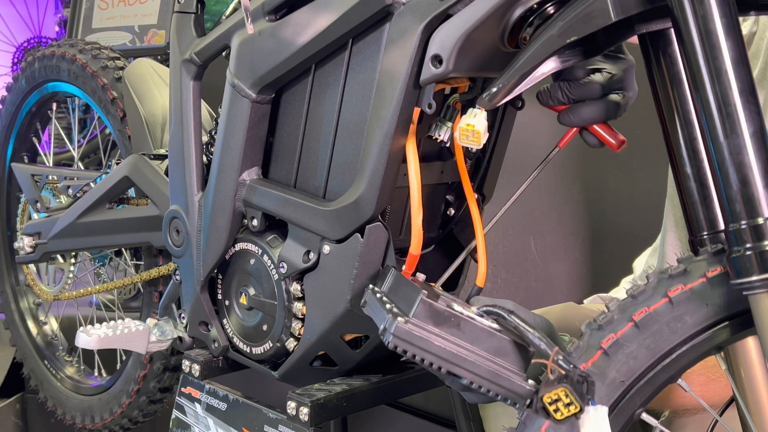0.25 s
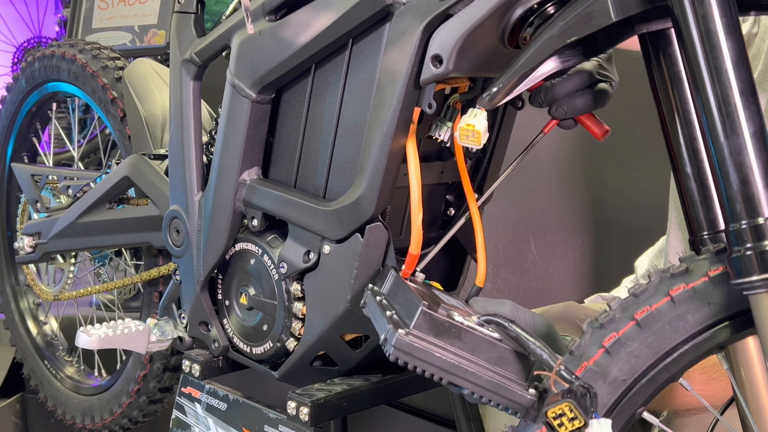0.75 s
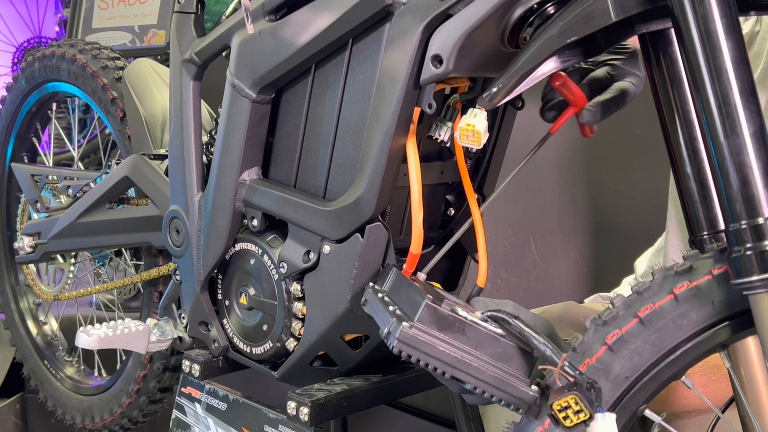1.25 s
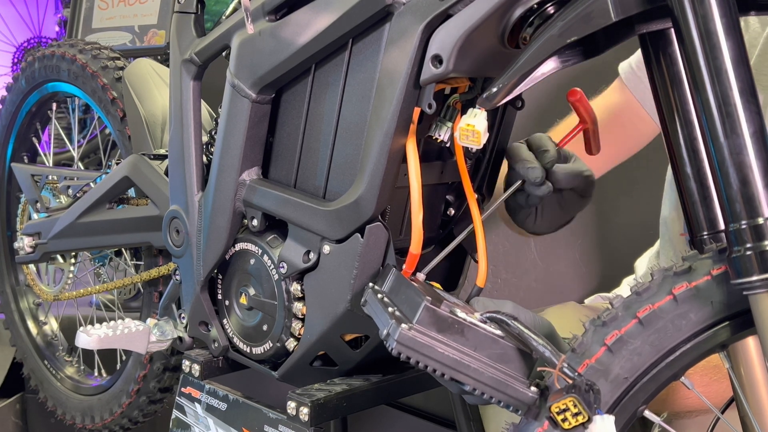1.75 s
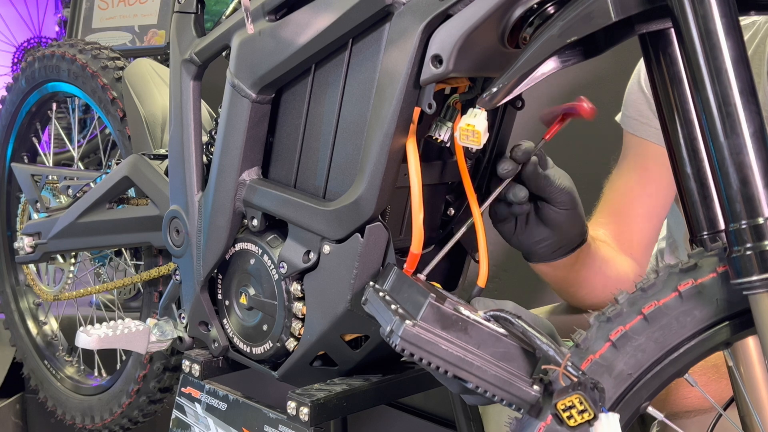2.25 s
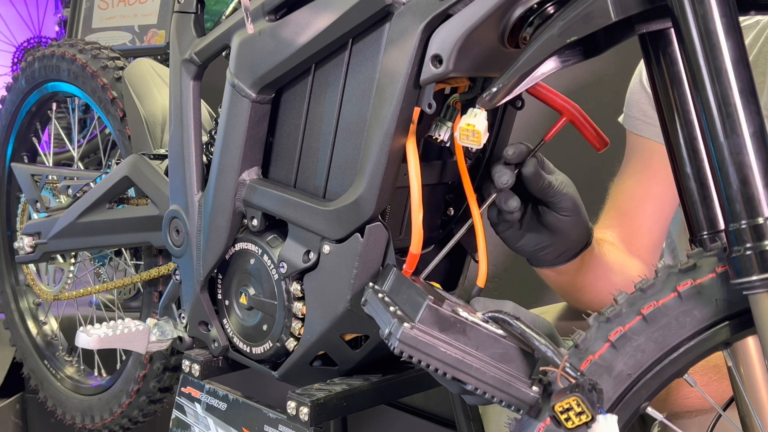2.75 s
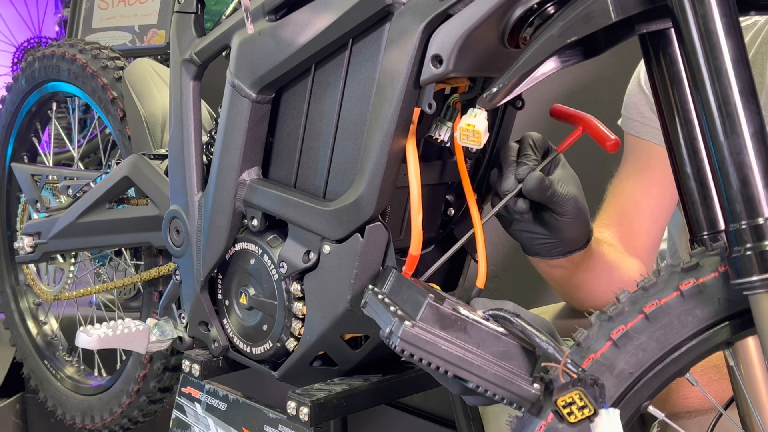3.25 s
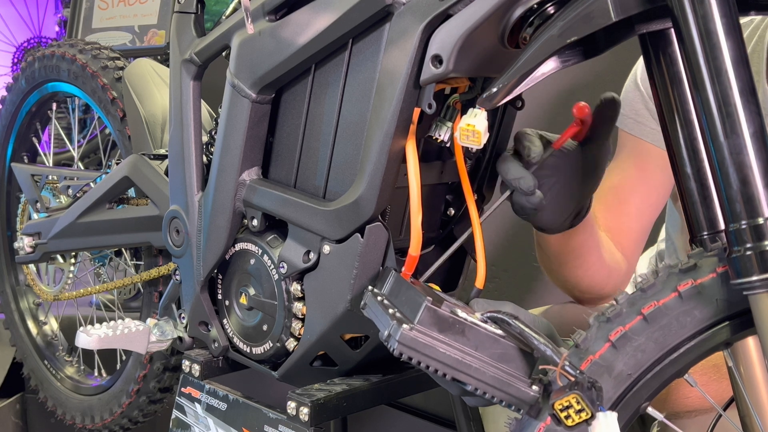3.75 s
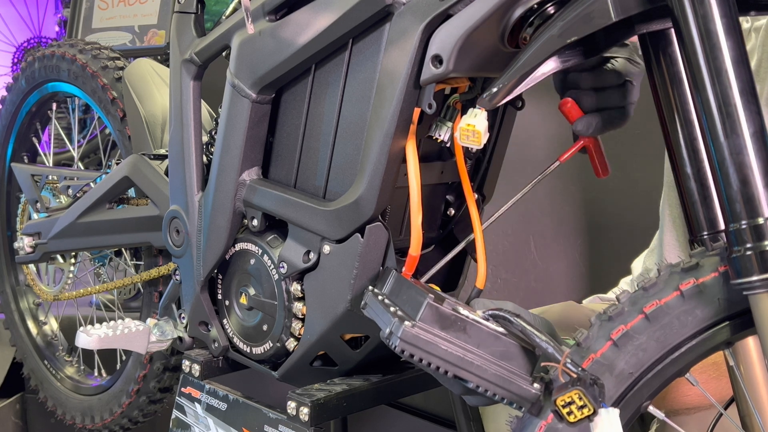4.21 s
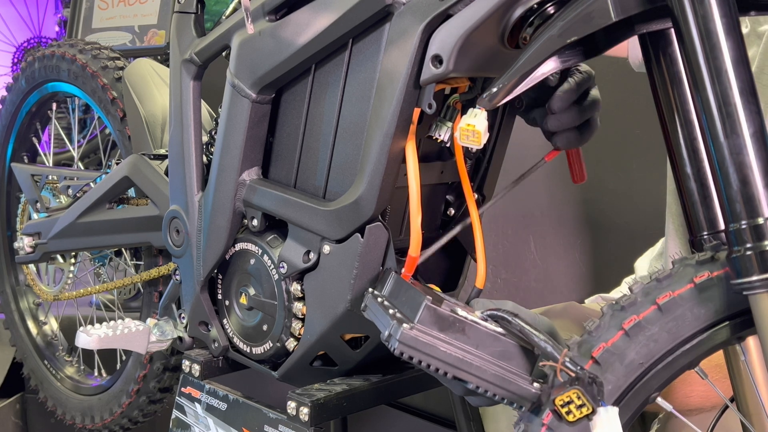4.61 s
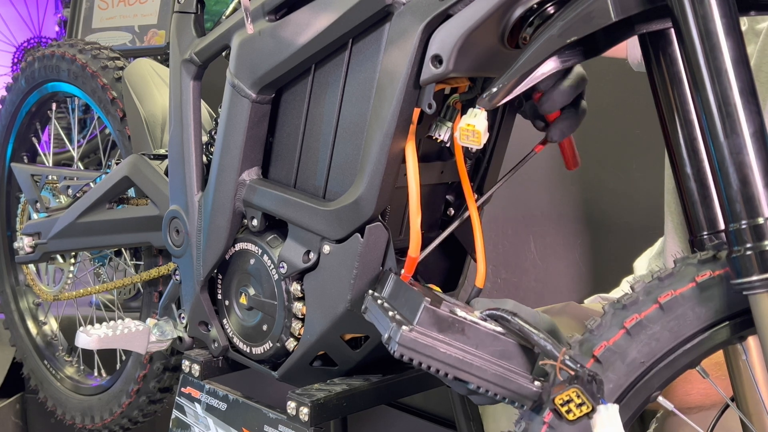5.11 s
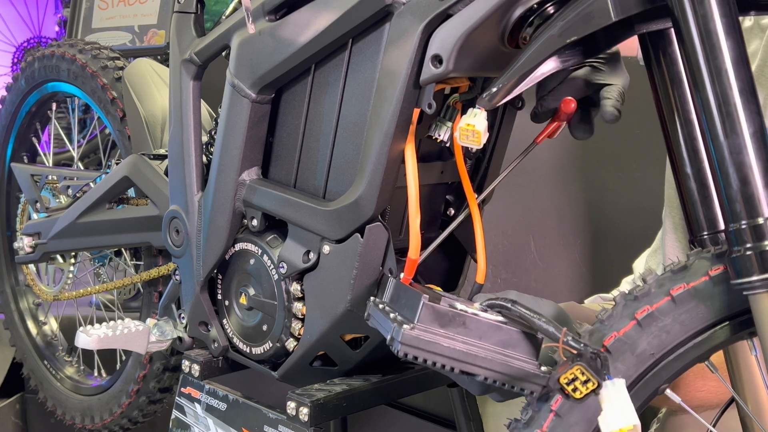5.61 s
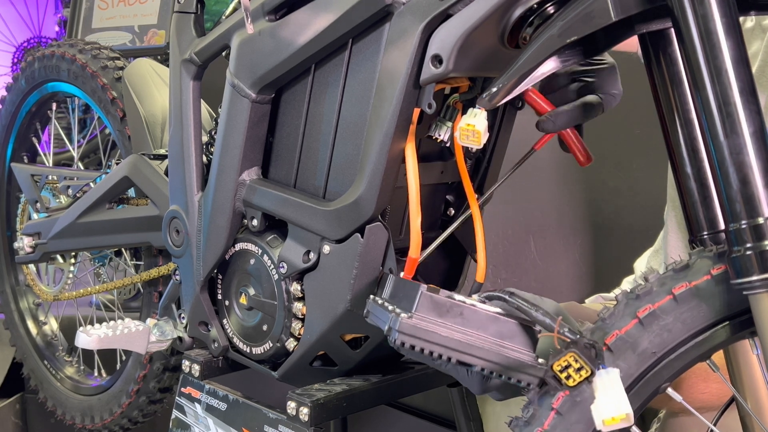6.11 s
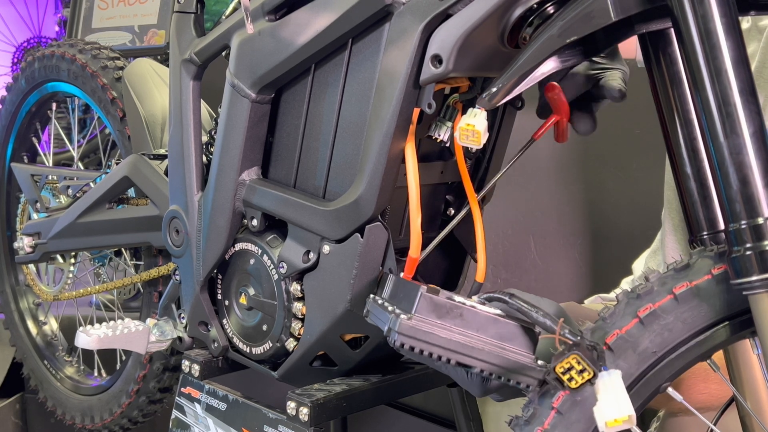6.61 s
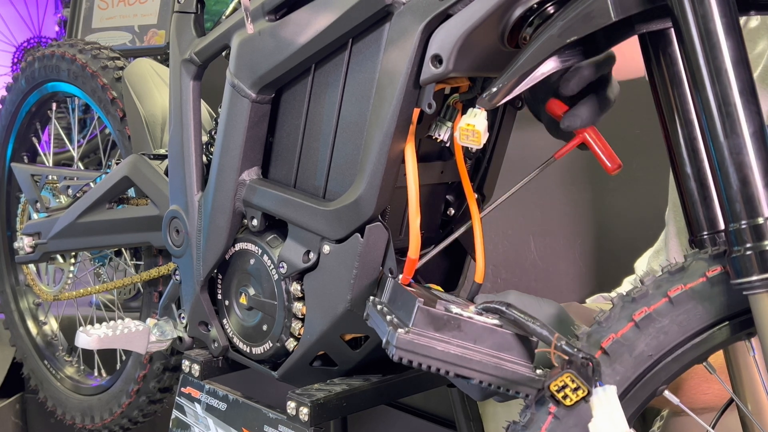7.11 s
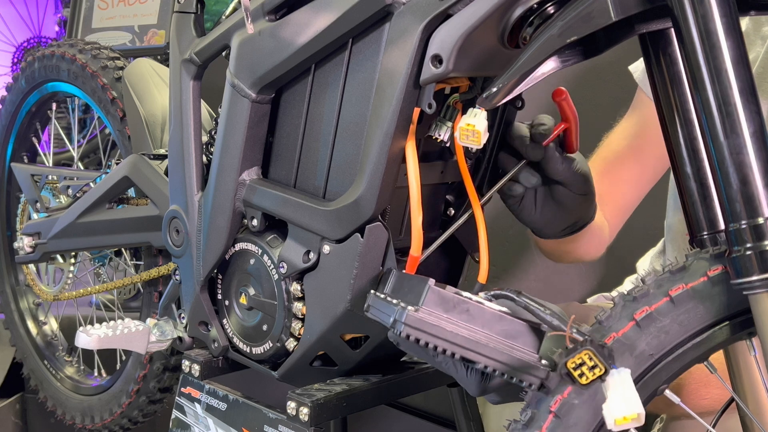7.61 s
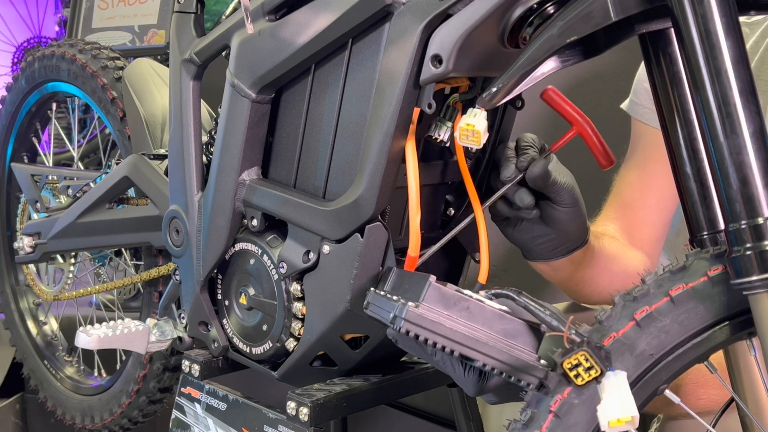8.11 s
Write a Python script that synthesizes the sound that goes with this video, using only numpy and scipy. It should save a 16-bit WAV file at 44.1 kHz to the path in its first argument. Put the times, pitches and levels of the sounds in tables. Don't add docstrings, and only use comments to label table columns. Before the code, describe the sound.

Metal tool on bolts, heard dry and near with the bass cut away: scattered clicks, short shaft scrapes and hollow plastic knocks. An abrupt loud crack comes about a third of the way through, and another, with looser rattling, about three quarters through. Between them are sparse clanks, tiny squeaks and whispering gloves. Faint dull bumps sound across the small, hard workshop, over steady airy fan hiss.

```python
import sys
import numpy as np
from scipy import signal
from scipy.fft import rfft, irfft
from scipy.io import wavfile
from scipy.ndimage import uniform_filter1d

SR = 44100
rng = np.random.default_rng(int(sys.argv[2]) if len(sys.argv) > 2 else 0)


def how_loud(loudness_db):
    steps = np.asarray(loudness_db, float) / 20
    return 10 ** steps


def persist_wave(psi):
    counts = np.round(np.clip(psi, -1, 1) * 32767).astype(np.int16)
    wavfile.write(sys.argv[1], SR, np.atleast_2d(counts).T)


N = 368676
SPAN = 8192
BASS_CUT_HZ, HISS_TOP_HZ = 513, 15950


def bell(hz, centre_hz, width_hz):
    return 1 / np.sqrt(1 + ((hz - centre_hz) / (width_hz / 2)) ** 2)


def shape(x, gain):
    hz = np.arange(len(x) // 2 + 1) * SR / len(x)
    return irfft(rfft(x) * gain(hz), len(x))


def level(x, db):
    return x * how_loud(db) / np.sqrt(np.mean(x ** 2))


def fade(t60):
    return np.exp(-np.log(1000) * np.arange(SPAN) / SR / np.clip(t60, .004, .5))


def swell(length):
    return np.sin(np.pi * np.clip(np.arange(SPAN) / SR / length, 0, 1) ** 0.76)


def ring(hz, db, t60):
    time = np.arange(SPAN) / SR
    return sum(how_loud(d) * fade(s) * np.sin(2 * np.pi * f * time) for f, d, s in zip(hz, db, t60))


def add(out, s, sound, db):
    i = int(s * SR)
    out[i:i + SPAN] += (sound * how_loud(db) / np.abs(sound).max())[:len(out) - i]


# frequency in Hz, density in dB per Hz.
FAN = [(160, -76.5), (280, -55.5), (455, -10), (646, -7), (1390, -6), (3050, -14), (11700, -29),
       (15200, -37)]
# frequency in Hz, width in Hz, level in dB.
FAN_NOTES = [(239, 36, -97.5), (480, 11, -72), (2500, 70, -71.5)]


def fan():
    log_hz, db = np.log(np.array(FAN)[:, 0]), np.array(FAN)[:, 1]
    hiss = shape(rng.standard_normal(N), lambda f: how_loud(np.interp(np.log(f + 1), log_hz, db)) * (f < HISS_TOP_HZ))
    waver = np.repeat(rng.standard_normal(N // 4000 + 1), 4000)[:N]
    waver_db = 0.73 * uniform_filter1d(waver, size=4000)
    notes = np.zeros(N)
    for hz, width_hz, note_db in FAN_NOTES:
        notes += level(shape(rng.standard_normal(N), lambda f: bell(f, hz, width_hz) ** 2), note_db)
    return level(hiss, -57.5) * how_loud(waver_db) + notes


# frequency in Hz, width in Hz, level in dB.
SCRAPE = [(7450, 700, 6), (10200, 1200, 2.5), (12200, 2200, -1.5), (14000, 1900, -23.5)]


def scrape(hz):
    return sum(how_loud(d) * bell(hz, c, w) ** 2 for c, w, d in SCRAPE)


# frequency in Hz, level in dB.
COVER = [(880, 1), (1010, 4), (1157, 6), (1280, -9), (1540, 5), (1900, -9)]
# frequency in Hz, level in dB.
UPPER = [(2420, -2), (2705, -13), (3140, 0.5), (3370, -5.5), (3930, -5), (4530, -12)]
# start in seconds, length in seconds, bright level in dB, middle level in dB, cover level in dB.
SLIDES = [
    (.365, 0.042, -53.5, -56, -58),
    (1.975, 0.07, -51, -59, -59.5),
    (2.33, 0.048, -47.5, -64, -53.5),
    (7.86, 0.089, -66, -59.5, -52.5),
]
# start in seconds, length in seconds, bright level in dB, middle level in dB, cover level in dB.
CHATTERS = [
    (2.376, 0.066, -43.5, -48.5, -49),
    (2.645, 0.081, -44, -43.5, -37),
    (5.06, 0.042, -38.5, -53, -67),
    (8.04, 0.02, -60, -59.5, -39.5),
]


def slides():
    time = np.arange(N) / SR
    grip_db = 1.1 * np.repeat(rng.exponential(size=(3, N // 88 + 1)), 88, axis=1)[:, :N]
    grains = rng.standard_normal((3, N)) * how_loud(grip_db)
    upper = lambda f: sum(how_loud(d) * bell(f, c, 110) ** 2 for c, d in UPPER)
    bright = shape(grains[0], scrape)
    middle = shape(grains[1], lambda f: upper(f) + 0.51 * bell(f, 5000, 4800) ** 2)
    cover = shape(grains[2], lambda f: sum(how_loud(d) * bell(f, c, 109) ** 2 for c, d in COVER))
    gains = np.zeros((3, N))
    for table, (rise_db, peak, sag, fall_db) in ((SLIDES, (14, 0.36, 0.75, 20)), (CHATTERS, (.1, 0.12, 0.39, 35))):
        for s, length, *layer_db in table:
            effort_db = np.interp((time - s) / length, [0, peak, sag, 1], [-rise_db, 0, -5.5, -fall_db], -99, -99)
            gains = gains + how_loud(np.add.outer(layer_db, effort_db))
    gains = uniform_filter1d(gains, size=200, axis=1)
    return sum(gain * level(layer, 0) for gain, layer in zip(gains, (bright, middle, cover)))


# start in seconds, peak level in dB, top share in dB, cover share in dB.
TICKS = [(.3905, -46, 12, -14), (.4475, -55, -20, -3), (.7284, -37, 16, -5), (.7753, -42.5, 13, -30),
         (.9452, -45, 30, -28), (1.0851, -30, 5, -28), (1.2424, -41.5, -2, -24), (1.318, -46, -13, -2),
         (1.979, -46, 5, -20), (2.0187, -39, -18, -19), (2.371, -33, 14, -30), (3.3711, -42, 8, -2),
         (4.796, -36, 12.5, -11), (4.832, -45.5, 17, -2), (4.8705, -60, 26, -11), (5.0534, -47.5, 20, -13),
         (5.0679, -30.5, 5.5, -30), (5.0807, -30.5, -2, -27), (5.6503, -35, 0, -3), (5.6575, -36, -4, 1),
         (6.2745, -49, -3, -14), (6.6435, -51, 13, 0), (7.4105, -35, 5.5, -23), (7.8895, -59, 20, -5),
         (8.0215, -41, 19, -12)]
# start in seconds, peak level in dB, top share in dB, cover share in dB.
TOCKS = [(.376, -55, 20, 2), (2.0996, -33.5, 3, -35), (2.4863, -40, 8, -15), (2.4977, -34, -13, -6),
         (3.1087, -50.5, -9, -2), (3.256, -49.5, 4.5, -16), (5.1996, -43, 3, -9), (6.0145, -50, -1, 8.5),
         (6.179, -18.5, -14.5, 2), (7.1675, -41, -12, -8), (7.9374, -60.5, 16, -2), (8.1498, -45, 7, -9)]
# start in seconds, peak level in dB, top share in dB, cover share in dB.
SNAP = [
    (2.6338, -9.5, -2, -7.5),
]
# start in
# seconds, peak level in dB.
PLAY = [(1.3924, -55), (1.673, -57), (3.2321, -57), (3.7896, -57), (3.876, -51.5), (4.6344, -54.5),
        (5.384, -61), (5.5845, -55), (5.96, -56), (5.988, -65), (6.1764, -33), (6.338, -54), (6.429, -65),
        (6.594, -53), (6.6672, -51), (6.6824, -60), (6.931, -52), (7.033, -51), (7.097, -48), (7.212, -52),
        (8.236, -60)]


def tick_rows():
    kinds = ((TICKS, 7660, 0.015), (TOCKS, 5670, 0.026), (SNAP, 7350, 0.0076))
    rows = [(s, db, 6400, 0.012, -1, -1) for s, db in PLAY]
    for table, hz, t60 in kinds:
        rows += [(s, db, hz, t60, top_db, cover_db) for s, db, top_db, cover_db in table]
    return sorted(rows)


# start in seconds, peak level in dB.
RINGS = [
    (0.3966, -40),
    (2.3854, -52),
    (4.795, -27),
    (4.8302, -33),
    (4.87, -38.5),
]
# frequency in Hz, level in dB, t60 in seconds.
ROD = [(4743, -20, .09), (7714, -8, .075), (11390, 0, .075), (12300, -8, .02), (14420, -14, .03)]


def ticks():
    out = np.zeros(N)
    lead = 256
    for s, db, hz, t60, top_db, cover_db in tick_rows():
        chance, patches = rng.standard_normal(6), rng.standard_normal(40)
        rattle = how_loud(-34) * fade(0.08) ** (np.arange(SPAN) / 900)
        burst = np.roll(rng.standard_normal(SPAN) * (fade(t60) + rattle), lead)
        patchy = lambda f: how_loud(3.5 * np.interp(f / 600, np.arange(40), patches))
        crack = lambda f: bell(f, hz, 510) ** 2 + 0.4 * bell(f, 6430, 4000) ** 2
        top = lambda f: bell(f, 11550, 1900) ** 2 + 0.44 * bell(f, 15000, 3000) ** 2
        cover = lambda f: sum(how_loud(d + 6.3 * v) * bell(f, c, 320) ** 2 for (c, d), v in zip(UPPER, chance))
        for colour, share_db in ((crack, 0), (top, top_db), (cover, cover_db)):
            sound = np.roll(shape(burst, lambda f: colour(f) * patchy(f)), -lead)
            add(out, s - .0003, sound * (1 - fade(0.0034)) * fade(.2), db + share_db)
    grip = np.clip(2 - 2 * np.arange(SPAN) / SR / 0.039, 0, 1)
    for s, db in RINGS:
        add(out, s, (1 - fade(0.0027)) * ring(*np.transpose(ROD)) * grip, db + 1)
    return out


# start in seconds, peak level in dB, main note in Hz, t60 in seconds, upper notes in dB.
KNOCKS = [
    (.38, -33.5, 1010, 0.043, -4),
    (2.359, -34.5, 1030, 0.033, -22),
    (2.477, -34, 1040, .06, -24),
    (2.498, -26, 933, .038, -2),
    (7.1672, -38, 800, 0.02, -1.5),
]
# start in seconds, peak level in dB, main note in Hz, t60 in seconds.
TAPS = [(1.323, -42.5, 1580, .089), (1.975, -46, 966, 0.14), (2.007, -40, 1010, 0.077),
        (2.042, -37, 760, 0.02), (2.331, -42, 1090, 0.075), (2.342, -41, 1060, 0.04),
        (2.3525, -37, 1040, .03), (2.665, -32, 1010, 0.042), (2.671, -38, 910, 0.037),
        (2.681, -38, 1030, 0.065), (2.697, -38, 1130, 0.043), (2.374, -56, 1560, .042),
        (3.046, -42.5, 956, 0.04), (3.838, -51, 1120, .06), (5.082, -43, 1230, 0.036),
        (7.89, -43, 1500, 0.042), (8.147, -44, 955, 0.14)]


def knocks():
    out = np.zeros(N)
    note_hz, note_db = np.transpose(COVER + UPPER)
    blows = [(*k, 1.4) for k in KNOCKS] + [(*t, -9, 0.76) for t in TAPS]
    for s, db, hz, t60, upper_db, push_ms in sorted(blows):
        chance = rng.standard_normal((2, len(note_hz)))
        gains_db = note_db + chance[0] + np.where(note_hz > 2200, upper_db - 6.5, -9)
        body = ring(note_hz * (1 + 0.03 * chance[1]), gains_db, 0.73 * t60 * (1000 / note_hz) ** 0.21)
        body = body + ring([hz, hz * 1.5], [-2.5, -9], [t60, t60 * 1.3])
        low = lambda f: 1.3 * bell(f, hz, 524) ** 2 + .5 * bell(f, 620, 300) ** 2
        clatter = shape(rng.standard_normal(SPAN), lambda f: how_loud(upper_db) * bell(f, 3200, 1300) ** 2 + low(f))
        push = np.minimum(np.arange(SPAN) / SR * 1000 / push_ms, 1)
        add(out, s, (body + how_loud(7.0) * fade(t60 * 1.2) * clatter) * push, db)
    return out


# start in seconds, peak level in dB, centre in Hz, width in Hz, length in seconds.
RUBS = [(1.219, -44.5, 6100, 770, 0.023), (2, -46, 7800, 700, 0.029), (1.79, -52, 8100, 1500, 0.042),
        (1.78, -51, 14000, 2500, .035), (5.642, -47, 7900, 2800, .013), (6.366, -55, 7000, 4500, .014),
        (5.342, -51.5, 8570, 3020, 0.039), (5.435, -55.5, 7500, 4000, .033), (5.584, -50, 7900, 900, 0.027),
        (6.5, -43, 8700, 7000, 0.04), (5.826, -45, 4500, 2200, 0.042), (5.981, -46.5, 7650, 920, 0.021),
        (7.645, -55, 8000, 800, 0.027)]
# start in seconds, peak level in dB, centre in Hz, length in seconds.
GLOVE = [(1.309, -45.5, 12300, 0.04), (3.246, -51, 12200, .0074), (4.111, -44.5, 13300, 0.042),
         (4.434, -49.5, 11400, 0.049), (4.49, -57.5, 13600, .03), (5.346, -57, 13200, .04),
         (5.575, -50, 13100, 0.032), (5.748, -57.5, 12500, .051), (5.823, -52, 12000, .03),
         (6.468, -50, 12800, .044), (6.589, -51, 12100, 0.021), (6.649, -46, 12670, 0.024),
         (6.75, -45, 11400, 0.026), (6.759, -49, 14000, 0.021), (6.841, -46, 13500, 0.025),
         (6.901, -51.5, 13300, 0.034), (7.015, -55, 13300, .03), (7.031, -55, 11100, .023),
         (7.627, -43, 11800, 0.016), (7.681, -56, 12000, .018), (7.732, -50.5, 12600, .036),
         (7.865, -53, 12500, 0.034), (7.898, -46.5, 12000, 0.035), (7.928, -54, 11400, .023),
         (7.986, -47, 11900, .03), (8.157, -57, 11540, 0.038), (8.26, -61, 11500, .02)]
# start in seconds, peak level in dB,
# note in Hz, length in seconds.
PINGS = [(0.451, -39, 1238, 0.023), (2.011, -44.5, 787, 0.032), (1.09, -38, 1586, .016),
         (2.369, -41, 1580, 0.019), (3.109, -43.5, 1482, 0.025), (5.201, -49, 2780, 0.014),
         (5.828, -41, 2850, 0.014), (7.333, -50.5, 2610, 0.057), (7.83, -50, 2660, 0.059),
         (7.866, -50, 947, 0.05), (7.899, -44.5, 1650, 0.029), (0.731, -47, 2640, .03),
         (7.386, -55, 2510, .02),
         (1.987, -48, 3300, 0.025), (2.1, -38, 3060, 0.0072), (3.105, -49.5, 3184, 0.021),
           (1.79, -54, 5000, .03), (5.065, -47, 3060, .012), (5.074, -45, 3630, 0.015),
           (6.013, -53, 3300, 0.01), (4.795, -35, 5900, .0047), (4.796, -45, 4150, 0.015),
           (5.201, -49, 3770, 0.017), (5.824, -46, 6450, .014), (5.825, -42, 4510, .014),
           (5.8425, -37, 3400, 0.012), (6.171, -45, 6700, 0.012), (6.493, -56, 8600, 0.025),
           (6.494, -54, 6200, .022), (6.495, -53, 4850, .02), (7.169, -54, 4500, .018),
           (7.167, -49, 7450, 0.02), (7.171, -53, 5730, .016), (8.155, -51.5, 3750, 0.024),
           (5.842, -45, 4550, .011), (5.854, -48, 4600, .01), (5.843, -44, 2900, .009),
           (5.83, -46, 3500, .011), (1.995, -50, 6600, .018), (.39, -44, 12250, .02),
           (6.759, -46, 11300, .01), (8.036, -44, 3300, .008), (2.048, -47, 800, .013),
           (8.017, -40, 1050, .006)]


def rubs():
    out = np.zeros(N)
    whispers = [(s, db, hz, 1400, length) for s, db, hz, length in GLOVE]
    for s, db, hz, width_hz, length in RUBS + whispers:
        colour = lambda f: bell(f, hz, width_hz) ** 2 + 0.19 * bell(f, 8100, 7400) ** 2
        add(out, s - .004, shape(rng.standard_normal(SPAN), colour) * swell(length), db)
    for s, db, hz, length in PINGS:
        wobble = shape(rng.standard_normal(SPAN), lambda f: bell(f, hz, 0.07 * hz) ** 2)
        add(out, s, (ring([hz], [0], [.4]) + level(wobble, -1.3)) * swell(length), db)
    return out


# start in seconds, peak level in dB, rattle in dB, rattle t60 in seconds.
CLANKS = [(.727, -27, -14.5, 0.06), (0.7742, -36, -10, .03), (0.946, -33.5, -7, .03),
          (1.085, -23.5, -13.5, 0.038), (2.3702, -25, -19, 0.038), (2.485, -16.5, -13, 0.019),
          (2.792, -28.5, -8, 0.038), (3.370, -22.5, 0, 0.035), (5.6496, -21, -10, 0.028),
          (7.4131, -24.5, -15, 0.038), (8.0199, -20.5, -3, 0.027), (8.036, -23, -14, .06)]
# frequency in Hz, width in Hz, level in dB.
EARLY_MODES = [
    [(1020, 62, -3), (1580, 220, 0), (2610, 190, -6.5), (3240, 290, -1), (5500, 94, -14), (6700, 120, -9),
     (7700, 120, -8), (8480, 210, -16), (9200, 120, -12)],
    [(4040, 110, -8), (5600, 120, -4), (6770, 110, -9), (7590, 140, 1), (8140, 200, -9)],
    [(3810, 120, -4), (6710, 170, -4), (7640, 240, 2), (8400, 160, -7), (8700, 140, 3), (9050, 150, -3)],
    [(936, 240, 2), (1450, 130, -2), (3140, 120, -8), (5590, 120, -7), (6600, 180, -8), (7580, 160, -2),
     (8050, 83, -9), (8460, 110, -13), (9100, 150, -14)],
    [(4790, 58, -9), (4950, 120, -4), (5730, 130, 1), (6400, 120, -9), (7200, 130, -3), (7800, 110, -1),
     (9400, 230, -4)],
    [(1020, 115, -3.5), (1262, 130, -0.5), (1594, 64, -11.5), (2030, 860, -15), (3360, 93, -12),
     (5560, 120, -38), (7430, 230, -27), (8930, 190, -35), (9410, 110, -41)],
]
# frequency in Hz, width in Hz, level in dB.
LATE_MODES = [
    [(730, 130, -4), (1125, 85, -1), (1623, 75, -12), (3260, 140, -10), (4140, 96, -18), (5890, 230, -8),
     (6440, 86, -15), (7090, 580, -6)],
    [(1015, 160, -2.5), (1590, 120, -4), (3070, 84, -11), (3620, 150, -1.5), (4700, 120, -4),
     (5300, 110, -12), (5890, 120, -9), (6330, 90, -20), (7580, 140, -6.5), (10500, 150, -5)],
    [(1060, 160, -5), (1460, 140, -4), (1840, 90, -13), (2490, 100, -6.5), (2980, 210, -9), (3770, 200, -2),
     (5660, 150, -11), (6060, 220, -6.5), (7450, 220, -10), (8380, 89, -31)],
    [(1010, 140, -8), (1650, 70, 0), (2810, 98, -10), (3440, 250, -9), (5200, 140, -16), (5600, 110, -20),
     (7650, 120, -13), (8600, 280, -27), (9500, 110, -20)],
    [(1030, 110, -6), (1560, 95, -2), (2520, 86, -10.5), (3080, 140, -11), (3420, 110, -12),
     (4020, 180, -21), (5180, 310, -15), (7640, 340, -11), (8760, 120, -31)],
    [(688, 120, -1.5), (991, 30, -4), (1245, 110, 4), (1550, 84, 0), (2980, 120, -15), (3600, 180, -15),
     (4060, 110, -27)],
]
CRUNCH_DB = [-7, -1, -6, -4, -5, -7, -10, -5.5, -5.5, -6, -10.5, -5]
# start in seconds, peak level in dB.
AFTER_RINGS = [
    (2.641, -28),
    (6.188, -24),
]
# frequency in Hz, level in dB, t60 in seconds.
AFTER_MODES = [
    [(1001, -6.5, 0.19), (1513, 1, 0.12), (2570, -12, 0.11), (2750, -3.5, 0.089), (2980, -16.5, 0.21),
     (3144, -5, 0.1), (3160, -12.5, 0.2), (3750, -24, 0.34), (4670, -14, 0.078)],
    [(870, -13.5, 0.17), (1265, -2, 0.073), (1570, 5, 0.06), (1880, -20, 0.26), (2390, -10.5, 0.18),
     (2420, -5, 0.083), (2730, -21, 0.1), (3060, -10, 0.085), (3440, -18, 0.16), (3650, -14, 0.12),
     (4097, -18, 0.08)],
]


def clanks():
    out = np.zeros(N)
    for (s, db, rattle_db, t60), modes, crunch_db in zip(CLANKS, EARLY_MODES + LATE_MODES, CRUNCH_DB):
        hz, width_hz, mode_db = np.transpose(modes)
        push = how_loud(rattle_db - 8.5) * rng.standard_normal(SPAN) * fade(t60)
        push[0] += 1
        mode_t60 = 2.95 / width_hz * (1000 / hz) ** 0.19
        body = ring(hz, mode_db + 20 * np.log10(width_hz / 100), mode_t60)
        add(out, s, signal.fftconvolve(push, body * (1 - fade(0.003)))[:SPAN], db)
        skirts = lambda f: sum(how_loud(d * 0.7) * bell(f, c, w * 5.4) ** 2 for c, w, d in modes)
        crunch = shape(rng.standard_normal(SPAN), skirts)
        add(out, s, crunch * fade(t60) * (1 - fade(0.0089)), db + crunch_db)
    for (s, db), modes in zip(AFTER_RINGS, AFTER_MODES):
        add(out, s, ring(*np.transpose(modes)) * (1 - fade(.02)), db)
    return out


# start in seconds, peak level in dB.
CREAKS = [
    (1.3494, -61),
    (1.4127, -54),
    (1.4694, -57),
    (1.5394, -55),
    (1.5738, -60),
    (1.6094, -57),
    (5.9095, -53),
    (6.0894, -51.5),
]


def creaks():
    out = np.zeros(N)
    colour = lambda f: bell(f, 10700, 15000) ** 2 * (f > BASS_CUT_HZ) * (f < HISS_TOP_HZ)
    for s, db in CREAKS:
        add(out, s - .002, shape(rng.standard_normal(SPAN), colour) * swell(.014), db)
    return out


# start in seconds, peak level in dB, clatter in dB, clatter t60 in seconds.
SLAMS = [
    (2.632, -4.5, -28, .07),
    (6.179, -6, -15, 0.14),
]
# frequency in Hz, width in Hz, level in dB.
SLAM_MODES = [
    [(654, 490, -19.5), (776, 310, -6), (1030, 370, 3), (1580, 120, -7.5), (2280, 200, -12.5),
     (2554, 200, -9), (2960, 220, -10), (4030, 370, -8), (4650, 156, -16), (5300, 500, -18.5),
     (5960, 380, -11.5), (7500, 580, -9), (8280, 550, -14), (10010, 990, -7.5)],
    [(654, 180, -11.5), (900, 123, -10), (1228, 460, 1), (1580, 150, 2.5), (1930, 480, 2), (2240, 190, -9),
     (2400, 210, 0), (2647, 190, -1.5), (3300, 280, 0.5), (3590, 160, -2), (4140, 280, -6.5),
     (4740, 340, -20), (6180, 110, -16), (9960, 610, -14)],
]


def slams():
    out = np.zeros(N)
    for (s, db, clatter_db, t60), modes in zip(SLAMS, SLAM_MODES):
        hz, width_hz, mode_db = np.transpose(modes)
        body = ring(hz, mode_db + 20 * np.log10(width_hz / 100), 4.8 / width_hz)
        add(out, s, body * (1 - fade(.008)), db)
        loose = lambda f: sum(how_loud(d) * bell(f, c, 2.0 * w) ** 2 * bell(c, 1500, 5000) for c, w, d in modes)
        clatter = shape(rng.standard_normal(SPAN), loose)
        add(out, s, clatter * fade(t60) * (1 - fade(0.012)), db + clatter_db)
    return out


# start in seconds, peak level in dB, note in Hz, swell time in
# seconds (the bump lasts 0.56 of it).
BUMPS = [
    (5.4, -57.5, 482, 0.071),
    (6.499, -53, 491, 0.06),
    (6.637, -58.5, 480, 0.068),
    (7.155, -52, 509, 0.045),
]


def bumps():
    out = np.zeros(N)
    for s, db, hz, t60 in BUMPS:
        add(out, s, swell(t60 * 0.56) * ring([hz, 238, hz], [0, -22, -8], [.3, .3, .1]), db + 6.0)
    return out


def room(x):
    noise = shape(rng.standard_normal(SPAN), lambda f: f < HISS_TOP_HZ)
    low = signal.sosfilt(signal.butter(2, 3500, fs=SR, output="sos"), noise)
    tail = low * fade(0.066) + (noise - low) * fade(0.047)
    tail = tail * (1 - fade(0.038))
    return x + how_loud(-18) * signal.fftconvolve(x, tail / np.sqrt(np.sum(tail ** 2)))[:N]


def scene():
    near = room(ticks() + knocks() + slides() + rubs() + slams() + clanks())
    microphone = signal.butter(10, [BASS_CUT_HZ, 14800], "band", fs=SR, output="sos")
    heard = signal.sosfilt(microphone, near) + how_loud(-100) * near
    return (heard + fan() + bumps() + creaks())[None]


def band_limit(x):
    return signal.sosfilt(signal.butter(12, 16790, fs=SR, output="sos"), x)


def record(dry):
    return band_limit(dry)


dry = scene()
out = record(dry)
persist_wave(out)
```